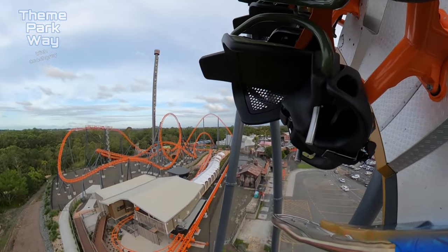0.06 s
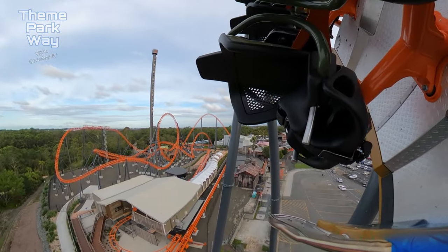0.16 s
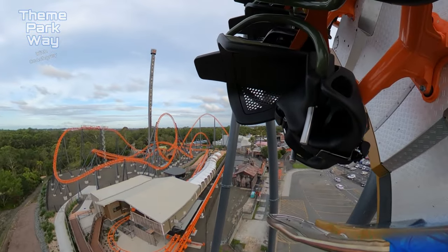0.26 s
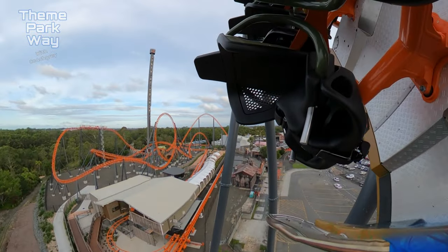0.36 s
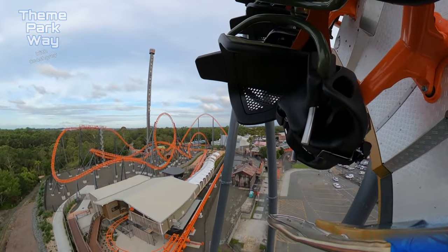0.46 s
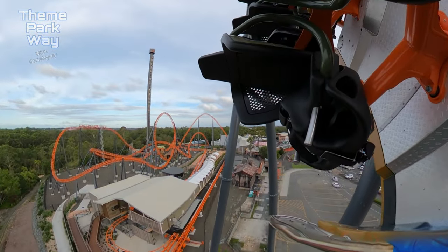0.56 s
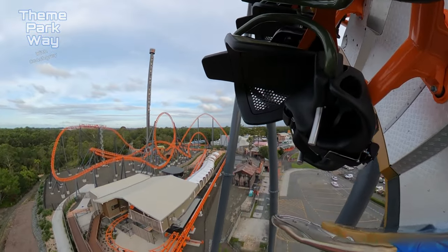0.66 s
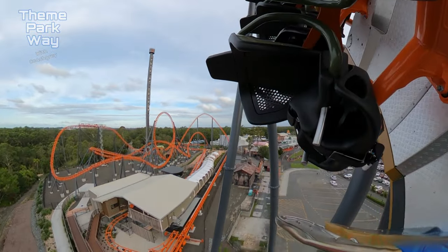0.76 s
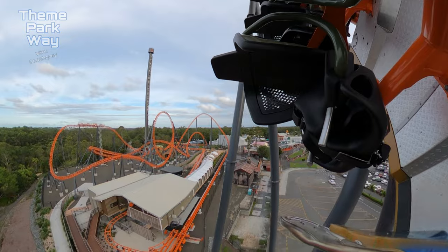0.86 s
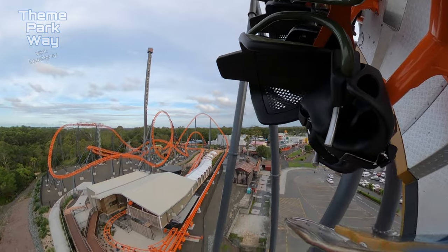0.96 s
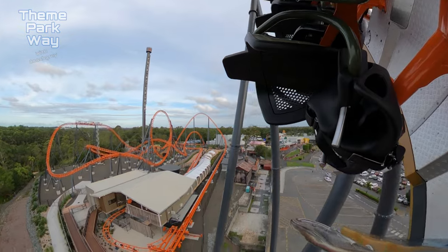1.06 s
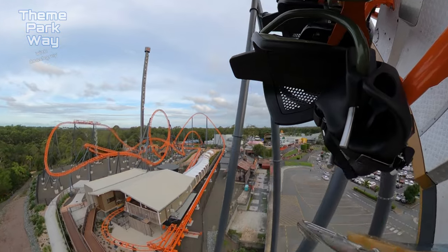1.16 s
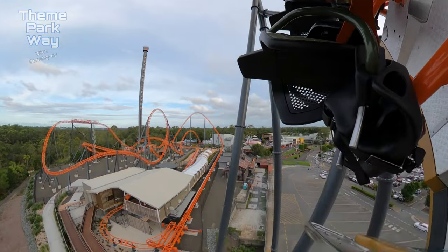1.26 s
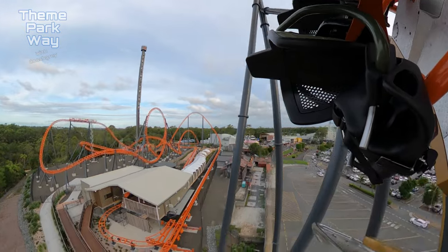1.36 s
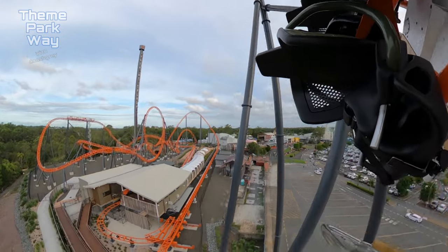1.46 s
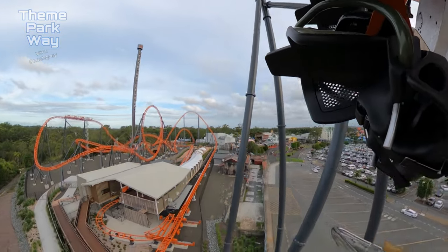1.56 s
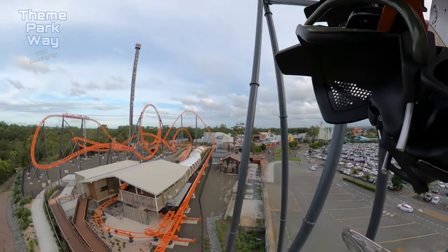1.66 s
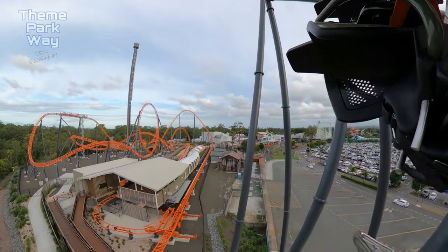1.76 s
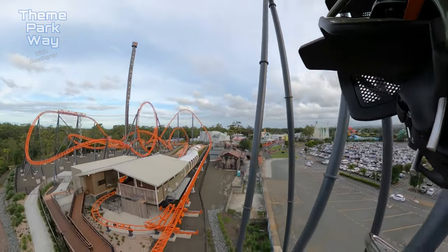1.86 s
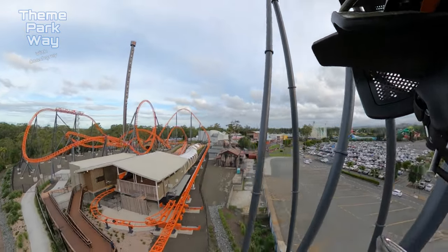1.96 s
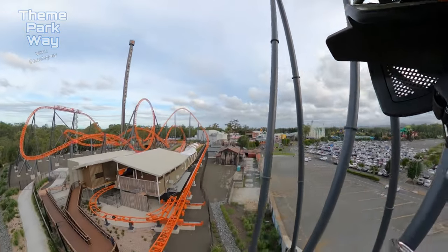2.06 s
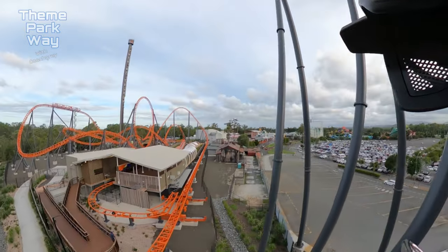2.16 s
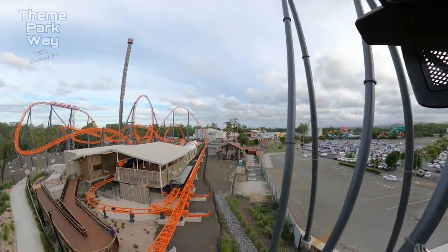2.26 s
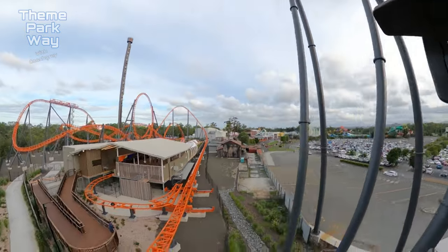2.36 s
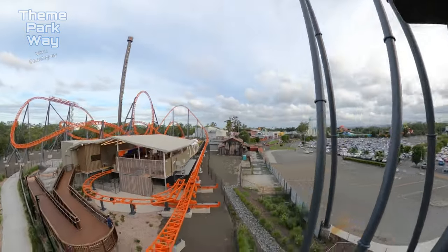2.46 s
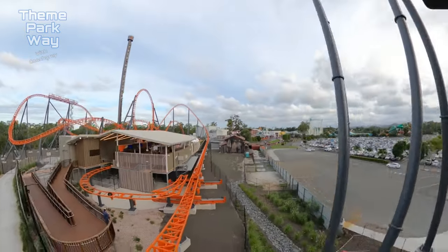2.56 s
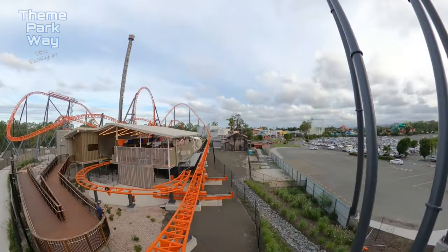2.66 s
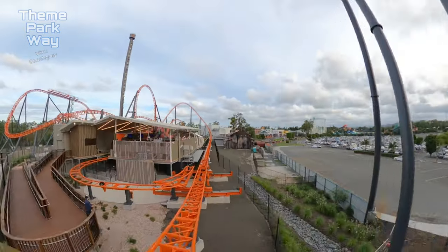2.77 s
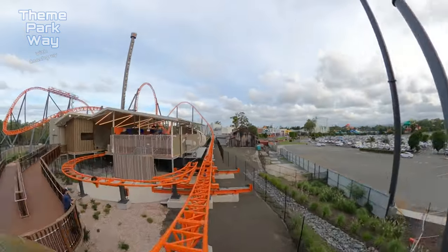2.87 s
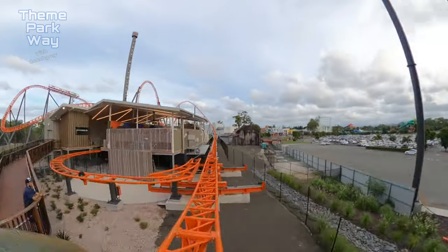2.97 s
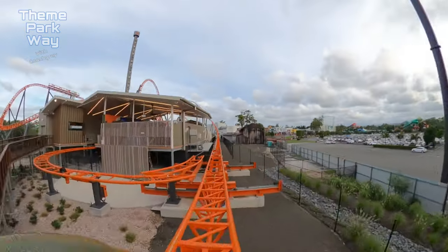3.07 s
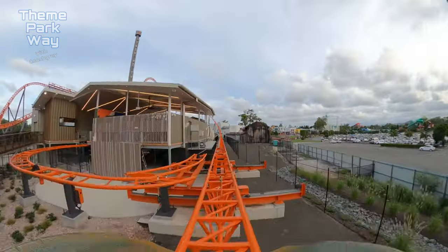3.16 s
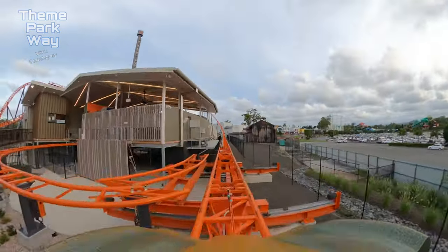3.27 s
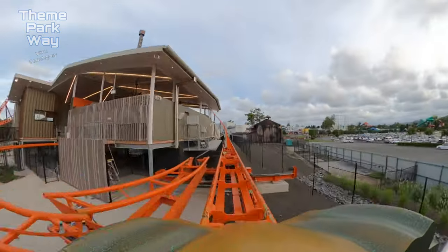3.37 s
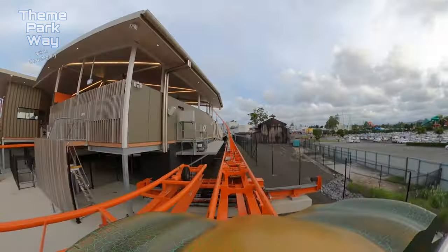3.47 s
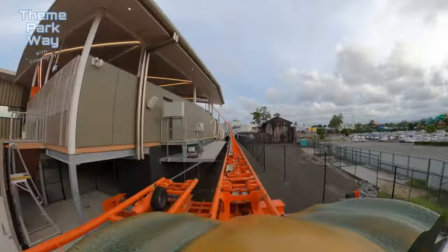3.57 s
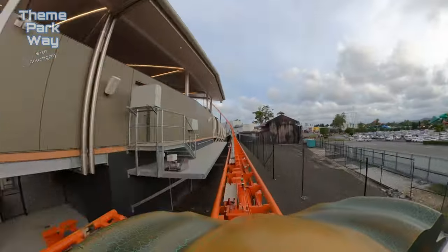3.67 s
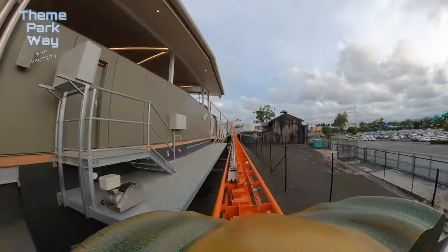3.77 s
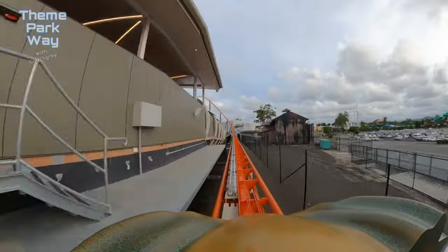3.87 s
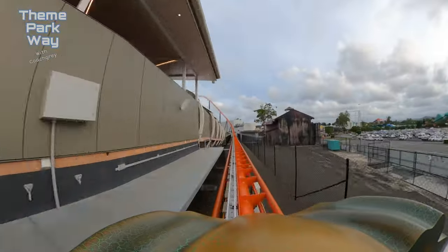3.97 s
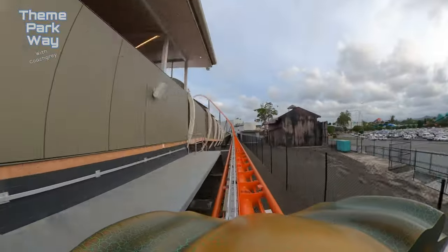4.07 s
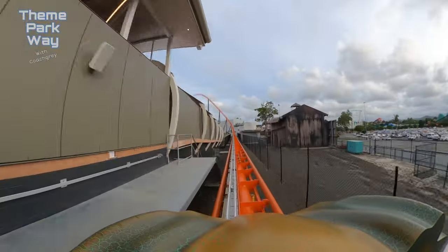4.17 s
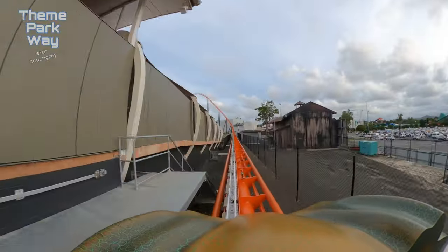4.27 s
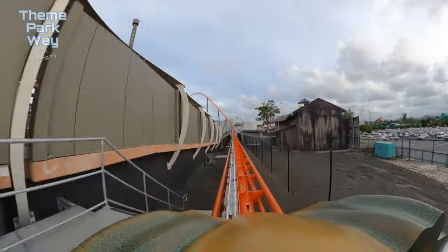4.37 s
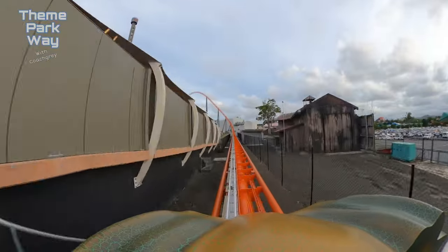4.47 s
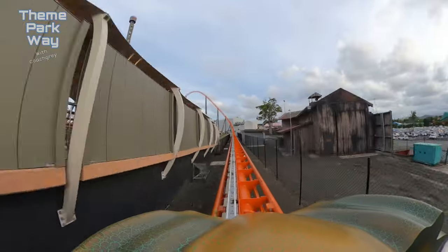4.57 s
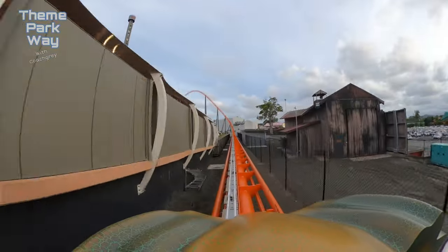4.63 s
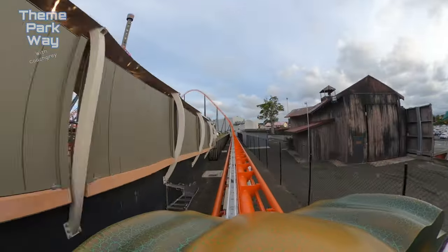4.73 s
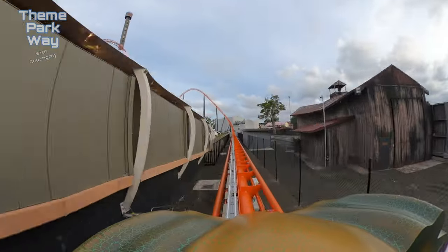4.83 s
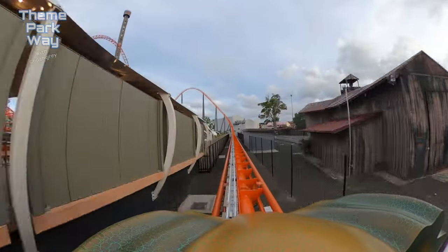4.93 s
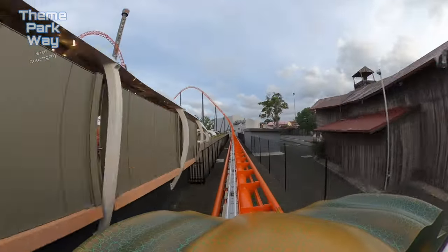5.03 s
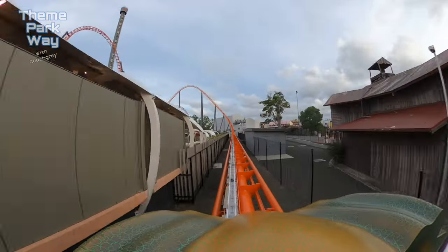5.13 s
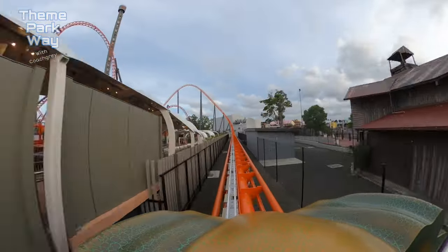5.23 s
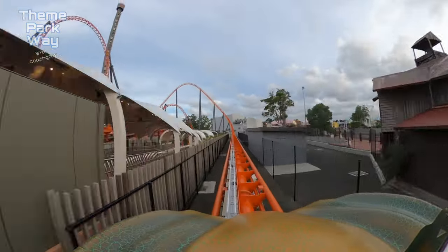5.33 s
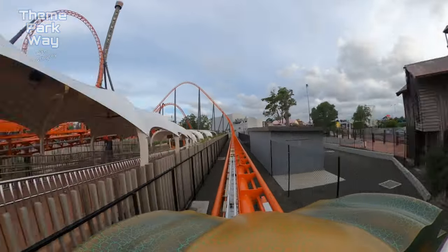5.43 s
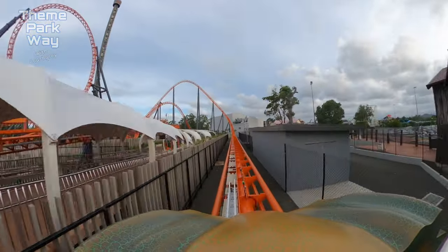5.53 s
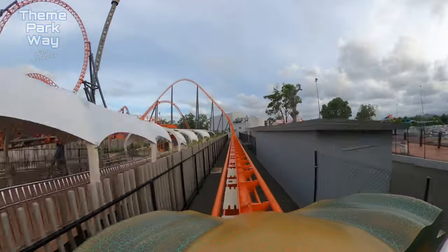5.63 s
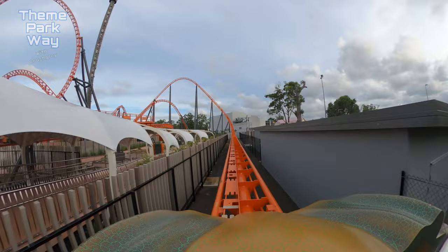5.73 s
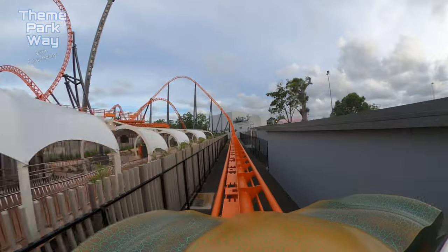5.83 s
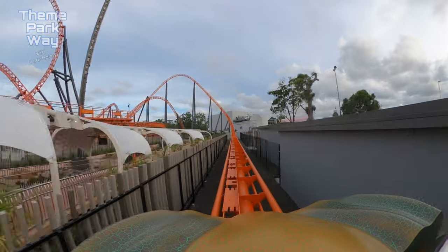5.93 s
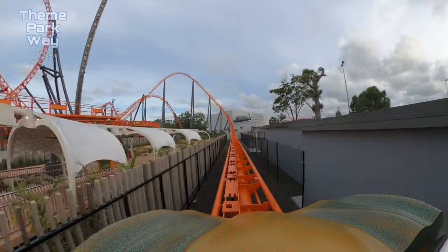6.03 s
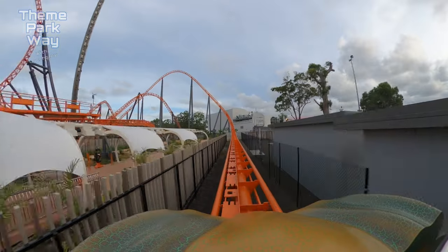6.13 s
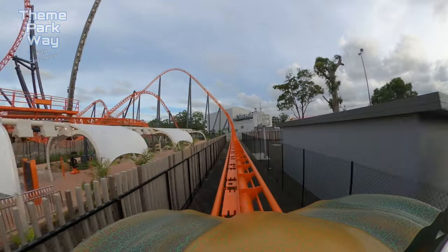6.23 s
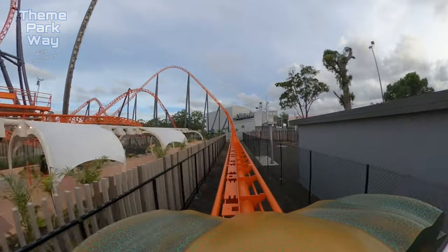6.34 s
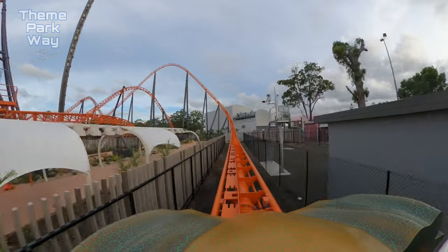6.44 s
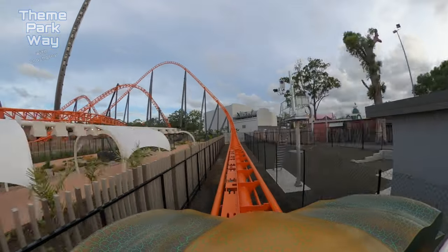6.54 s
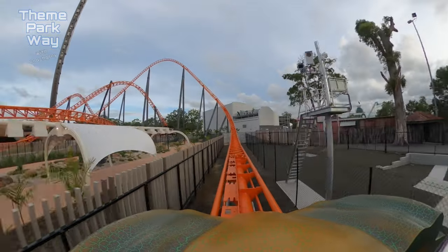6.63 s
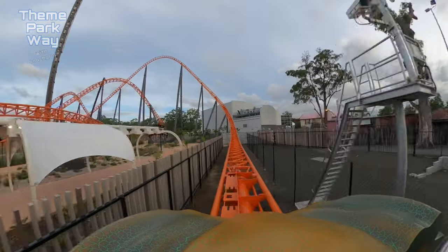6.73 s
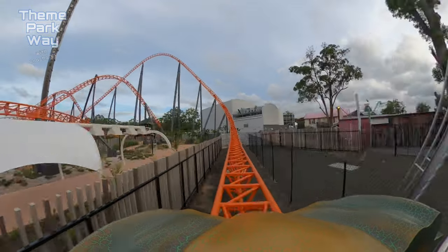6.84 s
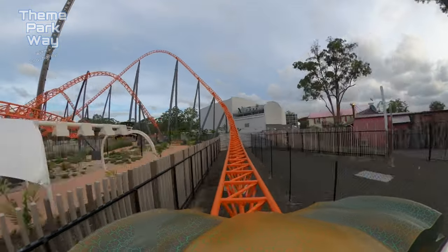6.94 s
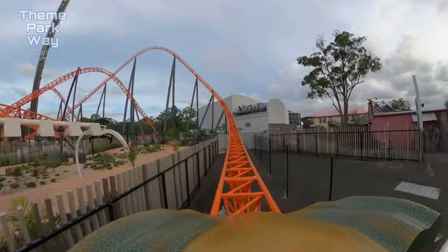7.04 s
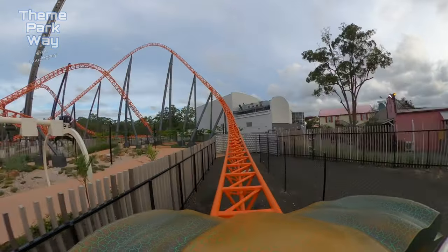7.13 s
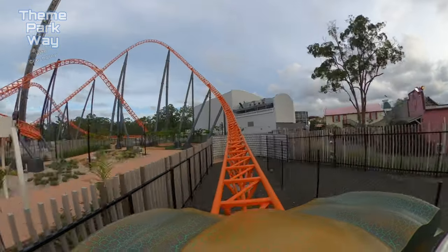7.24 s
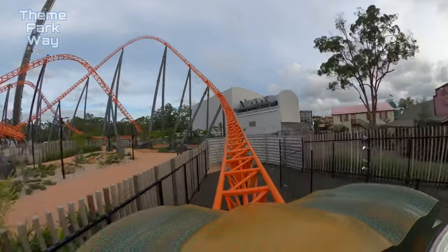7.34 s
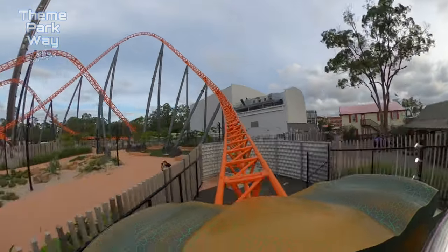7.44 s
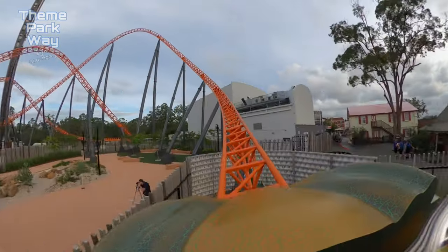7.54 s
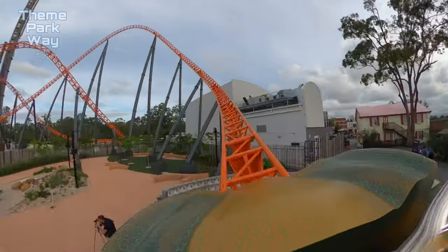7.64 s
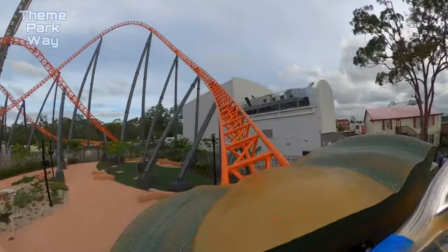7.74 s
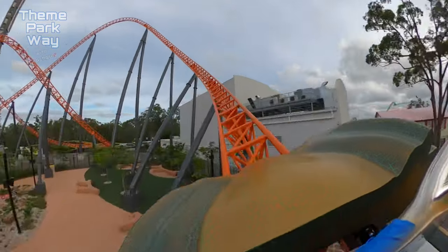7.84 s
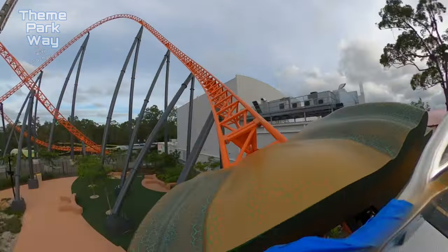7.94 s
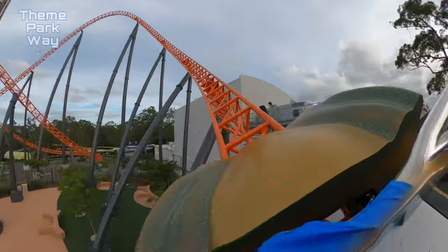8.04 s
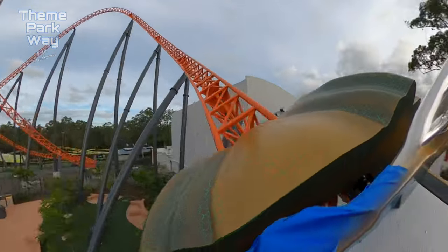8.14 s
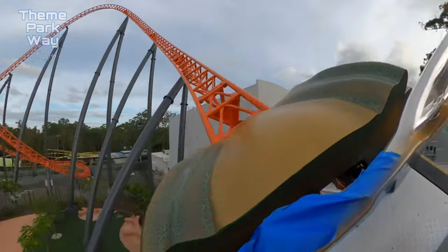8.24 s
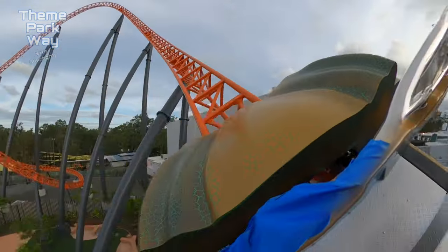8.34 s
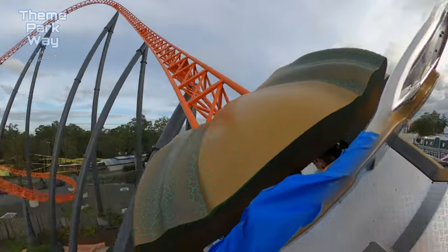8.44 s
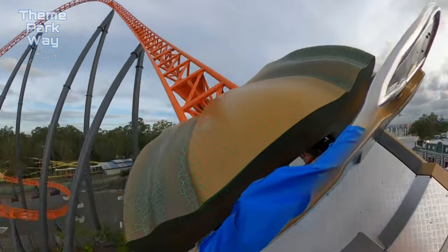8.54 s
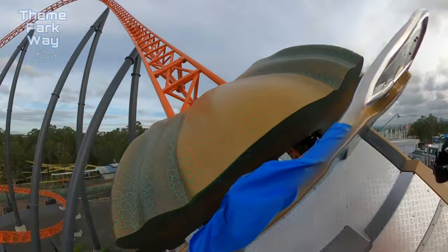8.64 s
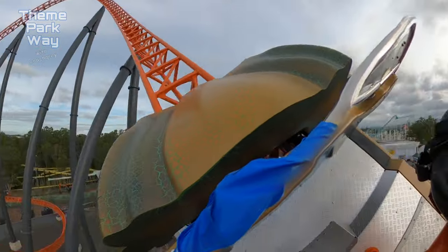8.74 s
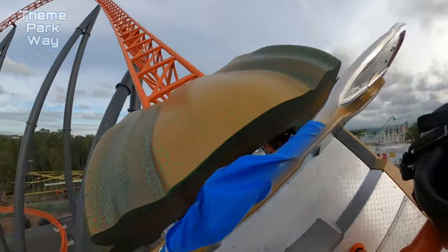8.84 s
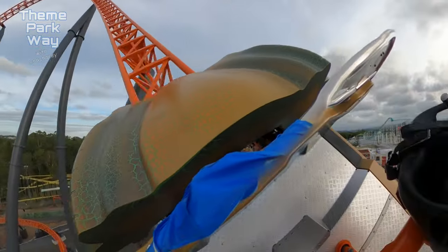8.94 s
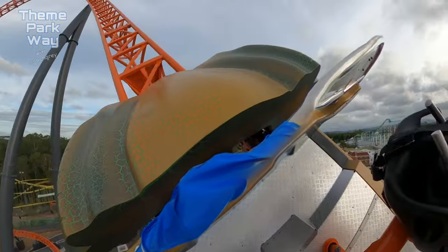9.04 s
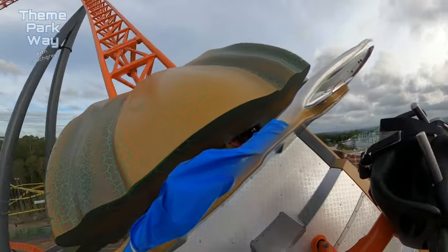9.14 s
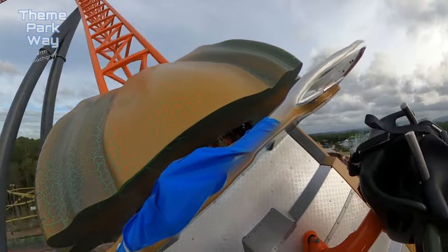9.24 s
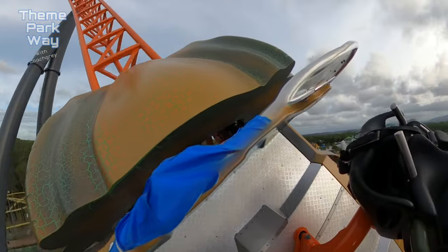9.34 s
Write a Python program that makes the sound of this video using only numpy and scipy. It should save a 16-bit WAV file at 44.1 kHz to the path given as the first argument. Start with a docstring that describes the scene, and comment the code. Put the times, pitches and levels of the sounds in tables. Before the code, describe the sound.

Aboard a roller coaster: low buffeting wind, a few steel clanks, a growing wheel roar, a burst of heavy rattling blows, then steadier rumbling.

```python
"""A low rumble of wind and a brief hum open the scene, then a roller coaster train drops from a steep spike.
It races along its launch straight and climbs a banked curve, with the microphone riding on the car.
Shaped noise makes the wind, wheel roar and air hiss; randomly driven resonances make hums, shaking and booms.
Short envelopes on noise make jolts and knocks; dying sines make clanks and thuds. A limiter holds the peaks."""
import sys
import numpy as np
from scipy import signal
from scipy.fft import rfft, irfft
from scipy.io import wavfile
from scipy.ndimage import uniform_filter1d, minimum_filter1d

SR = 44100
rng = np.random.default_rng(int(sys.argv[2]) if len(sys.argv) > 2 else 0)


def transcribe(u):
    """Save the signal u as a 16-bit wav file named by the first command-line argument.

    u: samples, shape (n,) or (channels, n), limited to [-1, 1]; the rate is SR.
    q: integer samples, one column per channel.
    """
    v = np.clip(np.atleast_2d(u).T, -1, 1)
    q = np.round(v * 32767).astype(np.int16)
    wavfile.write(sys.argv[1], SR, q)


N = 414540
T = np.arange(N) / SR  # time of every sample (s)
HZ = np.fft.rfftfreq(N, 1 / SR)  # frequency of every spectral bin (Hz)

# In every table, levels are relative to the gain that the playing function adds.


def gain_of(db):
    """Level law: decibels to amplitude."""
    return 10 ** (np.asarray(db) / 20)


def evened(x):
    """Normalization of mean power: scales to rms 1."""
    return x / np.sqrt(np.mean(x ** 2) + 1e-20)


def level(rows, axis=1):
    """Linear interpolation in decibels: one column of a curve as a gain for every sample."""
    rows = np.asarray(rows)
    return gain_of(np.interp(T, rows[:, 0], rows[:, axis]))


def noise(shape):
    """Spectral shaping: white noise filtered to a magnitude spectrum, rms 1."""
    spectrum = rfft(rng.standard_normal(N)) * shape
    return evened(irfft(spectrum, N))


def coloured(points):
    """Coloured noise: the spectrum joins (Hz, dB) points and falls away beyond them."""
    hz, db = np.transpose(points)
    ends = np.minimum(HZ / hz[0], 1) / np.maximum(HZ / hz[-1], 1) ** 2
    inside = gain_of(np.interp(np.log(HZ + 1), np.log(hz), db))
    return noise(ends * inside)


def ringing(hz, width_hz):
    """Random excitation of a resonance: near half amplitude at width_hz either side of its centre."""
    detune = (HZ - hz) / width_hz
    return noise(1 / (1 + detune ** 2 + (detune / 2) ** 4))


def flutter(low_hz, high_hz):
    """Random modulation: wavering mostly between two rates."""
    return noise(HZ / (HZ + low_hz) / (1 + (HZ / high_hz) ** 2))


def sustained(x, seconds):
    """Envelope flattening: evens out swells slower than the given time, as under a steady drive."""
    size = int(seconds * SR)
    power = uniform_filter1d(uniform_filter1d(x ** 2, size), size)
    return x / np.sqrt(abs(power) + 1e-6)


def swell(centre, length):
    """Gaussian envelope: peak 1 at the centre, 1/e at half the length on either side."""
    return np.exp(-(2 * (T - centre) / length) ** 2)


def running_phase(rows):
    """Phase as the integral of frequency, from the pitch column of a curve."""
    s, hz, _ = np.transpose(rows)
    return 2 * np.pi * np.cumsum(np.interp(T, s, hz)) / SR


def gliding(angle, width_hz):
    """Quadrature modulation: a noise band that follows a running phase."""
    in_phase = ringing(0, width_hz) * np.cos(angle)
    quadrature = ringing(0, width_hz) * np.sin(angle)
    return in_phase + quadrature


def patchy(x, patchy_db):
    """Time-frequency modulation: narrow patches of the spectrum swell and sink at random."""
    z = signal.stft(x, nperseg=1024, noverlap=768)[2]
    across_hz = uniform_filter1d(rng.standard_normal(z.shape), size=4, axis=0)
    patches = evened(uniform_filter1d(across_hz, size=12, axis=1))
    return evened(signal.istft(z * gain_of(patchy_db * patches), nperseg=1024, noverlap=768)[1][:N])


def rebounds(t, per_s, strength_db, decay_s):
    """Repeated impact: one contact, then irregular ones whose strength decays exponentially."""
    chance, size = rng.random((2, len(t)))
    hits = (chance < per_s / SR) * gain_of(strength_db) * 2 * size * np.exp(-t / decay_s)
    return np.where(t == 0, 1, hits)


# spectrum of the wind at the microphone: frequency_hz, density_db
BUFFET_COLOUR = [(8, -13), (20, 0.5), (36, -1), (52, -10), (78, 1.5), (105, -1), (135, -1), (160, -10.5),
                 (200, -15), (300, -32.5), (500, -47), (1200, -85)]


def buffeting():
    """Turbulence: pressure of large eddies at the microphone."""
    return sustained(coloured(BUFFET_COLOUR), seconds=0.042)


# strength of the underlying wind: time_s, level_db
WIND = [(0, -32), (.32, -39.5), (.62, -37), (.88, -26), (1.3, -22), (2.5, -23.5), (3.1, -19.5), (5.8, -20),
        (6.1, -26), (7.2, -22), (8.4, -27), (9.4, -19.5)]
# stronger gusts on top of it: centre_s, length_s, level_db
GUSTS = [(1.293, 0.14, -21), (1.557, 0.17, -20.5), (1.744, 0.044, -25), (2.197, 0.37, -19),
         (6.304, 0.13, -20), (6.997, 0.19, -20.5)]


def gusting():
    """Addition of powers: the underlying wind joined by a few gusts."""
    gusts = sum(gain_of(db) * swell(s, length) for s, length, db in GUSTS)
    return np.hypot(level(WIND), gusts)


# running noise of the slow train, high on the spike: time_s, level_db
COAST = [(0, -55), (.25, -55), (.55, -49.5), (.8, -46.5), (1.05, -46), (1.3, -52.5), (1.7, -53.5),
         (2.6, -59), (3, -93)]
# its spectrum: frequency_hz, density_db
COAST_COLOUR = [(200, -16.5), (500, 2.5), (900, 2.5), (1350, -1.5), (1700, -3.5), (2200, -10), (3200, -20),
                (6000, -37), (12000, -58.5)]


def coasting():
    """Rolling noise: a soft broad band that fades out after the drop."""
    return level(COAST) * coloured(COAST_COLOUR)


# tones that swell and fade: centre_s, length_s, pitch_hz, width_hz, level_db
HUMS = [(0, .14, 120, 10, -29), (.15, .55, 212, 1, -41.5), (.85, .5, 217, 1, -42.5),
        (.84, .17, 382, 3, -35.5), (1.05, .12, 382, 3, -42), (1.1, .6, 780, 25, -58),
        (.65, 1.1, 8230, 150, -86), (4.5, .16, 4000, 55, -56), (3.7, .3, 2540, 45, -57.5),
        (5.1, .5, 4050, 130, -60), (7.8, 1, 133, 5, -26), (8.25, .6, 108, 14, -25.5),
        (9.3, .6, 175, 18, -30)]


def hums():
    """Narrow-band resonance: hums and faint, rough whines swell and fade in turn."""
    out = np.zeros(N)
    for centre, length, hz, width, db in HUMS:
        envelope = np.exp(-2 * ((T - centre) / length) ** 2)
        out += gain_of(db) * envelope * sustained(ringing(hz, width), seconds=.05)
    return out


# sizzle of the wheel treads: time_s, pitch_hz, level_db
SIZZLE = [(0, 2000, -98.5), (1.7, 3000, -73.5), (2.25, 3650, -56.5), (2.7, 4350, -60.5), (3.1, 5300, -53.5),
          (3.6, 5100, -54.5), (4.2, 5600, -59), (4.8, 5900, -64), (5.6, 6300, -65), (7.4, 6400, -63),
          (8.4, 5700, -61), (9.4, 5100, -56)]


def sizzle(width_hz=900, octave_db=-21):
    """Tread noise: a gliding band and its faint octave, both following one pitch curve."""
    angle = running_phase(SIZZLE)
    octave = gain_of(octave_db) * gliding(2 * angle, width_hz)
    return level(SIZZLE, axis=2) * (gliding(angle, width_hz) + octave)


# whine of the wheels, strongest along the launch straight: time_s, pitch_hz, level_db
WHINE = [(4.3, 1530, -69), (4.48, 1590, -48), (4.75, 1630, -46.5), (5.0, 1680, -53), (5.4, 1780, -47.5),
         (5.9, 1650, -50), (6.25, 1600, -47), (6.6, 1650, -50.5), (7.4, 1620, -51), (8.1, 1700, -62),
         (8.5, 1700, -80)]


def whine(width_hz=210, grain_db=1.8, surge_db=2):
    """Modulated narrow-band noise: a diffuse, grainy wheel tone that surges and drifts in pitch."""
    fast = grain_db * flutter(low_hz=20, high_hz=110)
    slow = surge_db * flutter(low_hz=2, high_hz=6.3)
    grain = evened(gain_of(fast + slow))
    return level(WHINE, axis=2) * gliding(running_phase(WHINE), width_hz) * grain


# the ride, also driving the car body and jolts: time_s, drumming_db, roar_db, hiss_db
RIDE = [(0, -44.5, -62, -65.5), (.55, -46, -58, -68), (.9, -36, -54.5, -62), (1.4, -36, -50.5, -59),
        (1.8, -30, -46, -57.5), (2.22, -26, -41, -51.5), (2.6, -28, -41.5, -54), (3.35, -27.5, -36, -48),
        (3.78, -23.5, -31.5, -48), (4.75, -27, -34.5, -51.5), (5.25, -25, -34, -47.5),
        (5.9, -25.5, -33.5, -46.5), (6.45, -25.5, -31, -45.5), (7.45, -26, -32, -43.5),
        (7.95, -29.5, -33.5, -47.5), (8.5, -28.5, -36.5, -48.5), (9.4, -26.5, -39, -52)]
# spectra of the wheel roar and of the rushing air: frequency_hz, density_db
ROAR_COLOUR = [(150, -29.5), (300, 6.5), (420, 1.5), (550, -1.5), (800, -8.5), (1150, -11.5), (1650, -18.5),
               (2000, -23), (3000, -29), (5000, -45), (10000, -71.5)]
HISS_COLOUR = [(600, -15), (1500, 2.5), (2500, 1), (3800, 1), (5000, -3), (6300, -8.5), (7500, -12),
               (8700, -19), (10300, -25), (12500, -34), (15000, -48.5)]


def rush(eddies, roar_db=3, hiss_db=0, roar_patchy_db=2.0, hiss_patchy_db=1.2):
    """Amplitude modulation: eddy pressure slightly lowers the wheel roar and lifts the air hiss."""
    judder = flutter(low_hz=6.0, high_hz=70.4)
    roar_pulse = evened(gain_of(.03 * judder - .33 * eddies))
    hiss_pulse = evened(gain_of(.5 * judder + .35 * eddies))
    roar = patchy(coloured(ROAR_COLOUR), roar_patchy_db) * roar_pulse
    hiss = patchy(coloured(HISS_COLOUR), hiss_patchy_db) * hiss_pulse
    return gain_of(roar_db) * level(RIDE, axis=2) * roar + gain_of(hiss_db) * level(RIDE, axis=3) * hiss


# deep shaking of the car on its wheels: time_s, level_db
SHAKE = [(0, -43), (.15, -27.5), (.47, -39.5), (.95, -25.5), (1.33, -41), (1.55, -20), (4.9, -19.5),
         (7.4, -18), (7.9, -15.5), (8.7, -16), (9.4, -20)]


def shaking(hz=53, width_hz=14, shake_db=1.0):
    """Mass-spring resonance: the heavy car bounces on its wheels."""
    return gain_of(shake_db) * level(SHAKE) * sustained(ringing(hz, width_hz), seconds=0.055)


# spectrum of the drumming panels: frequency_hz, density_db
PANEL_COLOUR = [(100, -27), (165, -0.5), (215, 8), (300, 1), (400, -5.5), (550, -14.5), (900, -29),
                (2000, -75.5)]
# boom resonances of the car body: pitch_hz, width_hz, level_db
BODY_MODES = [(254.7, 9, 0.5), (273, 12, -8.5)]
# swells of the boom over uneven stretches of rail: centre_s, level_db
BOOMS = [(1.23, -26.5), (3.25, -16), (3.5, -18), (3.849, -13), (4.22, -19.5), (4.76, -24.5), (4.96, -26),
         (5.61, -13.5), (6.28, -23), (6.63, -16), (7.0, -22), (7.63, -18), (7.9, -19), (8.17, -15.5),
         (8.54, -24.5)]
BOOM_S = 0.13  # length of each boom (s)


def car_body(boom_db=-3, drone_db=-5.5, panel_db=-1, judder_db=1.0):
    """Forced vibration: the rails drive a narrow boom that wells up over a broad, uneven panel drumming."""
    drive = level(RIDE, axis=1)
    swells = sum(gain_of(db) * swell(s, BOOM_S) for s, db in BOOMS)
    boom = evened(sum(gain_of(db) * ringing(hz, width) for hz, width, db in BODY_MODES))
    boom_gain = np.hypot(gain_of(drone_db) * drive, gain_of(boom_db) * swells)
    judder = evened(gain_of(judder_db * flutter(low_hz=6.2, high_hz=45)))
    panels = sustained(coloured(PANEL_COLOUR), seconds=0.83) * judder
    return boom_gain * sustained(boom, seconds=0.043) + gain_of(panel_db) * drive * panels


# small bumps from the rails: rate (per s), length (s)
BUMPS_PER_S, BUMP_S = 5, 0.02
# their clatter and rattle against the panel drumming, and scatter either way (dB)
BUMP_CLATTER_DB, BUMP_RATTLE_DB, BUMP_SPREAD_DB = -11, -29.5, 1


def bumps():
    """Random excitation: one small jolt in each equal time slot, stronger the more the car drums."""
    s_ride, drumming_db = np.transpose(RIDE)[:2]
    rows = []
    for slot, (place, size) in enumerate(rng.random((int(BUMPS_PER_S * N / SR), 2))):
        s = (slot + place) / BUMPS_PER_S
        db = np.interp(s, s_ride, drumming_db) + BUMP_SPREAD_DB * (2 * size - 1)
        rows.append((s, BUMP_S, db + BUMP_CLATTER_DB, db + BUMP_RATTLE_DB))
    return rows


# one row a jolt: peak_s, length_s, clatter_db, rattle_db
JOLTS = [(0.63, 0.078, -57, -58), (1.24, 0.038, -32, -55), (1.35, 0.067, -45, -62), (1.51, 0.033, -35, -64),
         (1.544, 0.032, -35, -51), (1.588, 0.042, -35, -51), (1.835, 0.1, -35.5, -53.5),
         (2.06, 0.083, -37.5, -51.5), (2.243, 0.041, -30.5, -58), (2.303, 0.071, -34.5, -55),
         (2.445, 0.037, -43, -61), (2.85, 0.069, -34, -48.5), (3.232, 0.027, -32, -42.5),
         (3.569, 0.062, -28.5, -40), (3.865, 0.094, -31, -39), (4.191, 0.022, -19.5, -52),
         (4.219, 0.015, -26, -58), (4.325, 0.018, -31, -44), (4.38, 0.023, -27, -49),
         (4.406, 0.012, -22, -45), (4.473, 0.029, -25, -57), (4.522, 0.013, -33, -51),
         (4.616, 0.016, -27, -52), (4.686, 0.014, -27, -54), (4.762, 0.025, -24.5, -47),
         (4.893, 0.021, -28, -61), (4.95, 0.024, -24, -43.5), (5.035, 0.023, -26.5, -54),
         (5.078, 0.027, -31, -45), (5.18, 0.022, -28, -45), (5.21, 0.02, -26, -48),
         (5.297, 0.028, -24, -57), (5.344, 0.022, -29, -48), (5.376, 0.028, -30, -55),
         (5.439, 0.013, -19.5, -40), (5.467, 0.014, -24.5, -42), (5.575, 0.021, -24.5, -40),
         (5.61, 0.0074, -24, -49), (5.631, 0.048, -27, -47), (5.695, 0.027, -21.5, -45),
         (7.13, 0.04, -41, -52), (7.27, 0.067, -28.5, -47), (7.382, 0.052, -28.5, -51),
         (7.667, 0.085, -30.5, -44.5), (7.73, 0.034, -37, -58), (8.16, 0.032, -30, -40.5),
         (8.25, 0.042, -33.5, -54), (8.52, 0.061, -34, -54), (8.64, 0.042, -31, -60),
         (8.895, 0.047, -33.5, -50), (9.05, 0.04, -35.5, -57), (9.245, 0.042, -32.5, -65)]
# spectra of the three parts of a jolt: frequency_hz, density_db
THUMP_COLOUR = [(60, -22), (130, -0.5), (230, 0.5), (330, -3.5), (450, -11.5), (650, -23.5), (1200, -48)]
CLATTER_COLOUR = [(250, -5), (480, 3), (700, 6), (1000, -3.5), (1300, -6.5), (1900, -22), (3500, -30),
                  (7000, -54.5), (14000, -83.5)]
RATTLE_COLOUR = [(700, -6.5), (1800, 5.5), (3000, 0.5), (4000, -1), (5500, -6), (7500, -15), (10000, -25.5),
                 (14000, -47.5)]
HARD_HIT_DB = -23  # panel drumming at which the thump weight is 1


def jolts(eddies, thump_db=7.0, clatter_db=-5.5, rattle_db=-1, rag_db=1.5, eddy_db=-0.5, rise=1.0, fall=2.05):
    """Impulsive excitation: each jolt thumps the car and clatters its fittings under a ragged rattle."""
    swells = np.zeros((2, N))  # clatter, rattle
    for centre, length, *levels_db in list(JOLTS) + bumps():
        near = slice(*np.searchsorted(T, [centre - 3 * length, centre + 3 * length]))
        age = (T[near] - centre) / length
        envelope = np.exp(-(2 * age / np.where(age < 0, rise, fall)) ** 2)
        swells[:, near] += gain_of(levels_db)[:, None] * envelope
    weight = np.sqrt(level(RIDE, axis=1) / gain_of(HARD_HIT_DB))
    thump = gain_of(thump_db) * weight * swells[0] * sustained(coloured(THUMP_COLOUR), seconds=0.0031)
    clatter = gain_of(clatter_db) * swells[0] * sustained(coloured(CLATTER_COLOUR), seconds=0.0023)
    rattle = gain_of(rattle_db) * swells[1] * coloured(RATTLE_COLOUR)
    rag = rag_db * flutter(low_hz=90, high_hz=350) + eddy_db * eddies
    return thump + sustained(gain_of(rag), seconds=0.018) * (clatter + rattle)


# loose steel knocks as the train tips down: start_s, level_db
CLANKS = [(.615, -60), (1.208, -40), (1.234, -37), (1.541, -33.5), (1.585, -52), (1.831, -49)]
# ring of the steel frame: pitch_hz, level_db, t60_s
FRAME_MODES = [(587, 4, 0.35), (790, 1, .2), (1110, -4, .16), (1230, 4, 0.11), (1739, -10, .18),
               (2720, -21, .12), (3680, -14, 0.12), (3770, -12.5, .16), (4250, -22, .09)]


def clanks(scrape=0.007, chatter_per_s=260, chatter_db=-8, chatter_s=0.031):
    """Modal decay: a brief scraping blow rings the steel frame; the loose part chatters on."""
    t, out = T[:SR // 2], np.zeros(N)
    for s, db in CLANKS:
        phases = rng.uniform(0, 2 * np.pi, len(FRAME_MODES))
        ring = np.zeros(len(t))
        for (hz, mode_db, t60), phase in zip(FRAME_MODES, phases):
            ring += gain_of(mode_db - 60 * t / t60) * np.sin(2 * np.pi * hz * t + phase)
        chatter = rebounds(t, chatter_per_s, chatter_db, chatter_s)
        ring = signal.fftconvolve(ring * (1 - np.exp(-t / .0005)), chatter)[:len(t)]
        blow = np.exp(-t / scrape) * coloured(ROAR_COLOUR)[:len(t)]
        onset = 1 - np.exp(-t / .001)
        out[round(s * SR):][:len(t)] += gain_of(db) * onset * (0.34 * ring + 0.58 * blow)
    return out


# one contact: rise and decay (s); its rebounds: rate (per s), strength (dB), decay (s)
CONTACT_RISE_S, CONTACT_S = .0007, .0036
REBOUNDS_PER_S, REBOUND_DB, REBOUND_S = 600, -15, .014


def dying_band(t, hz, spread):
    """Band-limited impact noise: struck once and again by every rebound; its envelope peaks at 1."""
    contact = (1 - np.exp(-t / CONTACT_RISE_S)) * np.exp(-t / CONTACT_S)
    contacts = signal.fftconvolve(contact, rebounds(t, REBOUNDS_PER_S, REBOUND_DB, REBOUND_S))[:len(t)]
    edges_hz = hz * spread ** np.array([-1, 1])
    band = signal.butter(4, edges_hz, "bandpass", fs=SR, output="sos")
    ring = evened(signal.sosfilt(band, rng.standard_normal(2 * len(t))))
    ring = sustained(ring, seconds=.002)[len(t):]  # skip the filter's onset
    return contacts / contacts.max() * ring


# hard knocks of the wheels and loose fittings: start_s, clack_db, crack_db
KNOCKS = [(1.539, -29, -40), (1.589, -34, -39), (2.241, -38, -58), (2.278, -35, -53), (2.3, -36, -47),
          (2.329, -37, -53), (2.428, -37, -58), (2.469, -35, -58), (4.186, -21, -36), (4.203, -26, -42),
          (4.22, -26, -43), (4.402, -24, -32), (4.519, -30, -42), (4.611, -27, -39), (4.686, -31, -38),
          (4.757, -30, -40), (4.888, -29, -48), (4.952, -29, -42), (5.03, -32, -39), (5.05, -28, -46),
          (5.083, -29, -43), (5.183, -32, -36), (5.207, -22.5, -35), (5.246, -25, -44), (5.339, -26, -38),
          (5.372, -29, -41), (5.438, -26, -27), (5.464, -27, -35), (5.576, -33, -40), (5.604, -22, -39),
          (5.624, -26, -38), (5.677, -32, -39), (5.694, -28, -33), (5.703, -29, -36), (7.767, -42, -38),
          (8.157, -36, -41), (8.889, -30, -45)]
CLACK_HZ, CRACK_HZ = 690, 1860  # band centres


def knocks(dull_hz=5000):
    """Impact of steel on steel: a hollow clack under a brighter crack, drawn out by dense rebounds."""
    t, out = T[:SR // 8], np.zeros(N)
    for s, clack_db, crack_db in KNOCKS:
        clack = gain_of(clack_db) * dying_band(t, CLACK_HZ, 1.6)
        crack = gain_of(crack_db) * dying_band(t, CRACK_HZ, 1.7)
        out[round(s * SR):][:len(t)] += clack + crack
    return signal.sosfilt(signal.butter(2, dull_hz, fs=SR, output="sos"), out)


# heavy blows of the wheels on the track: peak_s, level_db, pitch_hz
THUDS = [(4.089, -15, 275), (4.202, -11, 290), (4.222, -8.5, 290), (4.324, -10, 330), (4.387, -13, 315),
         (4.473, -11, 295), (4.52, -14, 350), (4.687, -13, 295), (4.756, -14, 305), (4.96, -13, 290),
         (5.082, -14, 400), (5.208, -15, 420), (5.297, -8, 305), (5.342, -13, 415), (5.467, -12, 355),
         (5.57, -13, 320), (5.613, -12, 300), (5.673, -15, 350), (5.699, -13, 290), (5.848, -17, 380),
         (6.2, -18, 370), (7.249, -16, 315), (8.526, -15, 285)]
# each blow: rise and decay (s), its upper partial (ratio of pitch, dB)
THUD_RISE_S, THUD_S, THUD_PARTIAL, THUD_PARTIAL_DB = .005, .008, 1.6, -9


def thuds():
    """Damped oscillation: a blow cushioned by the wheel treads swings the chassis a few cycles."""
    out = np.zeros(N)
    phases = rng.uniform(0, 2 * np.pi, (len(THUDS), 2))
    for (s, db, hz), (low, high) in zip(THUDS, phases):
        near = slice(*np.searchsorted(T, [s - .02, s + .08]))
        age = T[near] - s
        envelope = np.exp(np.where(age < 0, -(age / THUD_RISE_S) ** 2, -age / THUD_S))
        angle = 2 * np.pi * hz * age
        partial = gain_of(THUD_PARTIAL_DB) * np.sin(THUD_PARTIAL * angle + high)
        out[near] += gain_of(db) * envelope * (np.sin(angle + low) + partial)
    return out


def scene(wind_db=3.5):
    """Superposition: all sources add at the one microphone."""
    eddies = buffeting()
    wind = gain_of(wind_db) * gusting() * eddies
    car = shaking() + car_body() + jolts(eddies) + thuds() + knocks() + clanks() + hums()
    wheels = rush(eddies) + sizzle() + whine() + coasting()
    return (wind + car + wheels)[None]


CEILING_DB, EDGE_HZ = -3.5, 15400  # limiter ceiling, upper band limit


def record(dry, hold=0.016):
    """Look-ahead limiting: smoothed gain dips hold the largest swings; then soft ends and a band limit."""
    room = np.minimum(gain_of(CEILING_DB) / (abs(dry[0]) + 1e-9), 1)
    size = int(hold * SR)
    lowest = minimum_filter1d(room, 2 * size)
    limited = dry * uniform_filter1d(uniform_filter1d(lowest, size), size)
    limited = limited * np.minimum(np.minimum(T, T[::-1]) / .002, 1)
    lowpass = signal.firwin(511, EDGE_HZ, window=("kaiser", 9), fs=SR)
    return signal.oaconvolve(limited, lowpass[None], "same")


dry = scene()
out = record(dry)
transcribe(out)
```